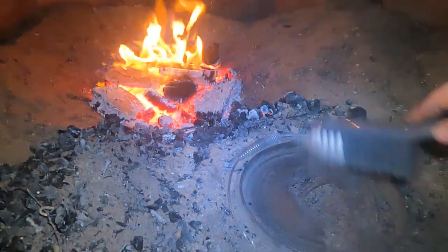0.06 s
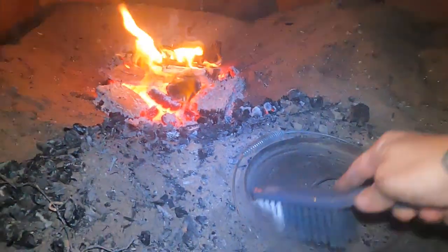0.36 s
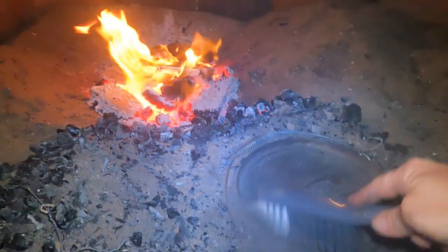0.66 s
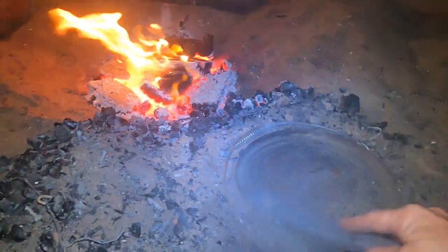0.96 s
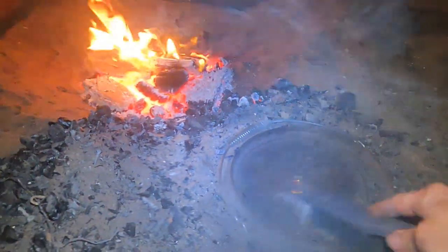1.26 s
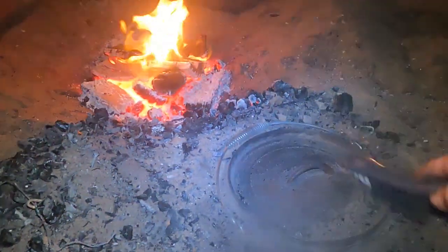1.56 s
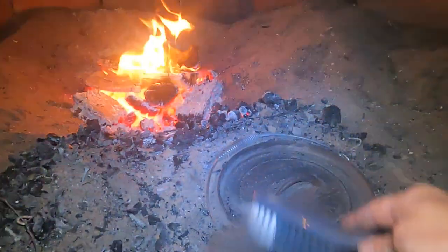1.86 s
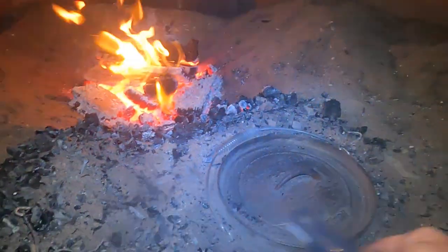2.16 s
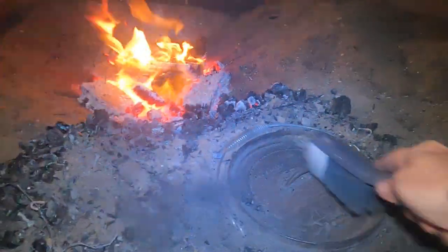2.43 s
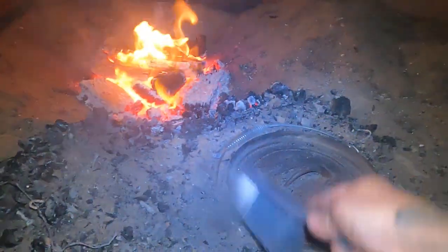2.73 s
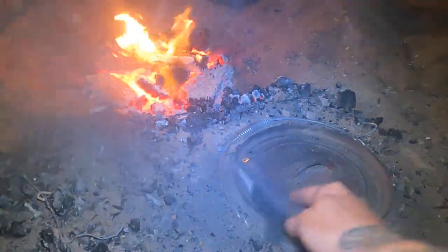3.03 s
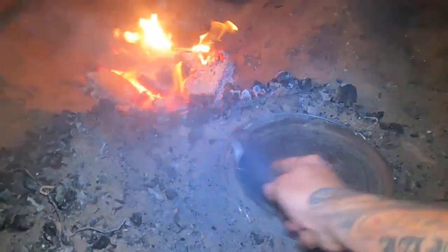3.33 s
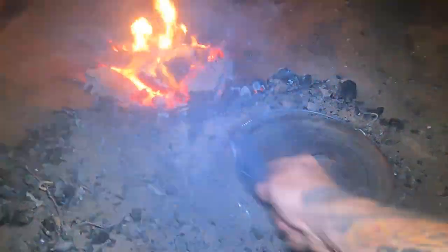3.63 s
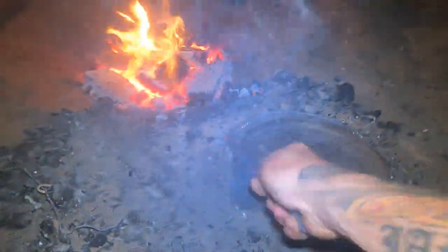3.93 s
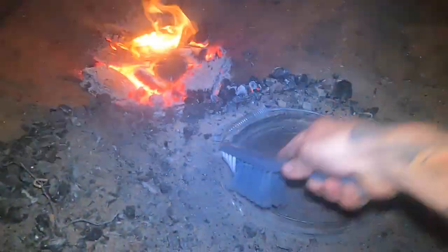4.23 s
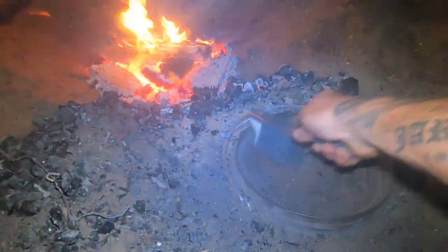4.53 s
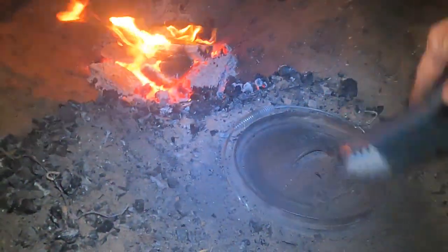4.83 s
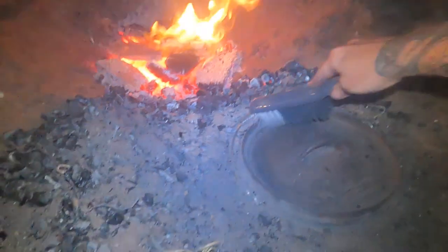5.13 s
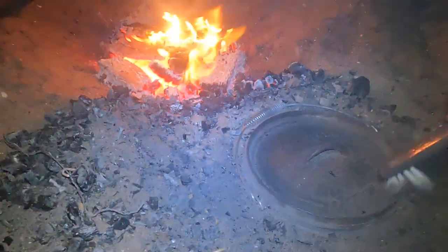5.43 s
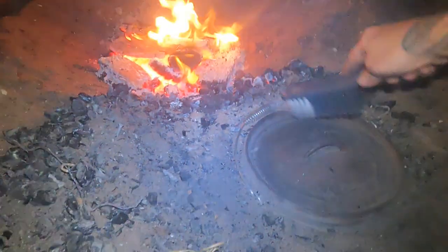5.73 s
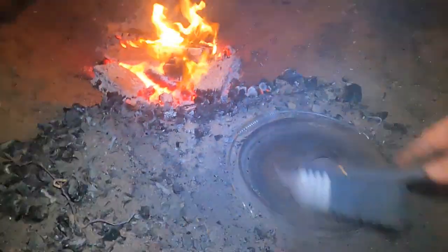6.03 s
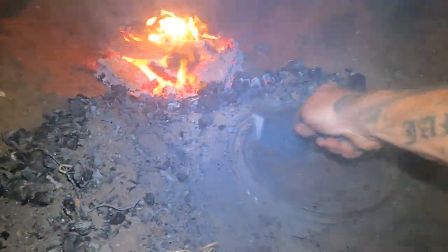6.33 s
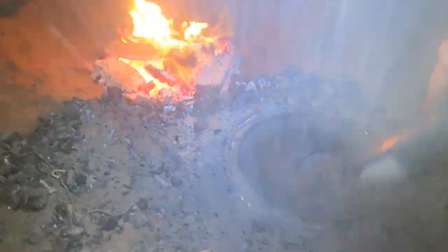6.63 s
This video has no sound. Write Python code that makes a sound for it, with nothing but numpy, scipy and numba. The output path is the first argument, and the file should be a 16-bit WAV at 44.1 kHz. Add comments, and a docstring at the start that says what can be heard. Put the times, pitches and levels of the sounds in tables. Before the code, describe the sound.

A stiff brush sweeps ash off an iron lid in quick rasping strokes, with occasional knocks, beside a softly fluttering fire.

```python
"""Brushing ash off an iron lid

A stiff hand brush sweeps an iron pot lid lying beside a small wood fire, outdoors.
Bristles catch and flick in a dense rasp that rings the lid, and friction makes a few modes sing.
Now and then the brush slaps down and the lid thuds. Loose grit ticks while flames flutter softly."""
import sys
import numpy as np
from scipy import signal
from scipy.fft import rfft, irfft
from scipy.io import wavfile
from numba import njit

SR = 44100
rng = np.random.default_rng(int(sys.argv[2]) if len(sys.argv) > 2 else 0)


def master(y):
    """Save y as 16-bit WAV."""
    cut = np.clip(np.atleast_2d(y).T, -1, 1)
    pcm = np.round(cut * 32767)  # scale
    wavfile.write(sys.argv[1], SR, pcm.astype(np.int16))


N = 303849
TIME = np.arange(N) / SR


def undb(db):
    """Decibels to gain."""
    return 10 ** (np.asarray(db) / 20)


def add(track, s, sound):
    """Mix a sound into a track at s seconds."""
    start = max(int(s * SR), 0)
    track[start:start + len(sound)] += sound[:max(N - start, 0)]


def bump(s, length_s):
    """A smooth rise and fall around a moment, peaking at 1."""
    return np.exp(-(2 * (TIME - s) / length_s) ** 2)


def walk(rate):
    """Random drift with a spread near 1, heading for a new value rate times a second."""
    knots = rng.standard_normal(int(rate * N / SR) + 2)
    return 1.2 * np.interp(TIME * rate, np.arange(len(knots)), knots)


def flicks(rate, spread_db):
    """Random tiny impacts of unequal size, rms 1; rate per second."""
    chance = np.clip(rate / SR, 1 / SR, 1)
    hits = (rng.random(N) < chance) * rng.choice([-1, 1], N)
    clicks = hits * undb(spread_db * rng.standard_normal(N)) / np.sqrt(chance)
    return clicks / np.std(clicks)


def colour(x, points, size=2048):
    """Minimum-phase EQ of unit power that follows a curve of (Hz, dB) points."""
    hz, db = np.transpose(points)
    bins = np.maximum(np.arange(size // 2 + 1) * SR / size, 1)
    gain = undb(np.interp(np.log(bins), np.log(hz), db))
    cepstrum = irfft(np.log(gain))
    response = irfft(np.exp(rfft(2 * cepstrum[:size // 2], size)))
    return signal.fftconvolve(x, response / np.linalg.norm(response))[:N]


def mode(x, hz, t60):
    """One decaying resonance of unit power."""
    r = 1000 ** (-1 / (t60 * SR))
    feedback = [1, -2 * r * np.cos(2 * np.pi * hz / SR), r * r]
    return np.sqrt((1 - r * r) / 2) * signal.lfilter([1, 0, -1], feedback, x)


@njit
def glide(x, hz, q):
    """Band-pass whose centre moves, of about unit power."""
    y, band, low = np.empty(len(x)), 0., 0.
    for i in range(len(x)):
        g = np.tan(np.pi * hz[i] / SR)
        v = (band + g * (x[i] + 1e-18 - low)) / (1 + g * (g + 1 / q))
        band, low = 2 * v - band, low + 2 * g * v
        y[i] = v / np.sqrt(g * q)
    return y


# The hand digs in for a moment. Each row: centre in seconds, length in seconds, extra pressure in dB.
HAND_DIGS = [(0.395, 0.032, 3), (1.056, 0.022, 2), (1.873, 0.026, 2.5), (2.697, 0.048, 3.5),
             (3.13, 0.038, 3), (4.823, 0.044, 2.5), (5.5, .03, 4), (5.55, .035, 2.5), (5.895, 0.032, 5.5),
             (5.965, 0.018, 2.5), (6.622, 0.067, 4.5), (6.688, 0.025, 1.5)]


def hand(touch_s, full_s, lift_s, gone_s, landing_db, sag_db, fade_db=23, edge_s=.0016):
    """The hand leans in, sags and lifts: contact (0 to 1), pressure in dB, progress (-.5 to .5)."""
    def share(start_s, end_s, limit=1):
        """How far the time has come between two moments."""
        return np.minimum(np.maximum(TIME - start_s, 0) / np.maximum(end_s - start_s, 1 / SR), limit)
    swell = landing_db * (1 - share(touch_s, full_s))
    sag = sag_db * np.sin(np.pi * share(full_s, lift_s)) ** 2
    gone_s = np.maximum(gone_s, lift_s + .055)  # the quickest the hand can lift
    fade = fade_db * share(lift_s, gone_s, limit=np.inf) ** 1.226
    digs = sum(db * bump(s, length_s) for s, length_s, db in HAND_DIGS)
    pressure_db = np.maximum(digs - swell - sag - fade, -100)
    return share(touch_s, touch_s + edge_s), pressure_db, share(touch_s, gone_s) - .5


# Sweeps of the brush. Each row: touch-down, full pressure, start of lift and end of fade in seconds;
# level, softening on landing, mid-hold sag, hiss send, scrape send and lid send in dB;
# pitch of the bristle tips in Hz; sends to the low, middle and high singing modes in dB.
SWEEPS = [ (0.0, 0.028, .038, 0.13, -26, -1, -3.5, -10.5, -19.5, -0.5, 3620, -25, -10, -18),
          (0.32, .405, 0.46, 0.53, -26.5, 7, 1.5, -14, -18.5, 2.5, 3240, -19, -28, -28),
          (0.675, 0.731, .76, 0.82, -26, 10.5, 0.5, -11, -19.5, -0.5, 2730, -25, -30, -20),
          (0.987, 1.06, 1.075, 1.197, -26, 9, 1.5, -10.5, -16, 1.5, 2810, -17.5, -23, -20),
          (1.323, 1.385, 1.414, 1.478, -28, 7.5, 0, -7, -12.5, 5, 2910, -20.5, -18, -14),
          (1.644, 1.87, 1.93, 2.025, -27, 7, -2, -9, -14, 0, 3150, -39, -16, -19),
          (2.181, 2.316, 2.348, 2.45, -28, 13.5, 1, -9.5, -13.5, 1, 3380, -30, -21, -24),
          (2.598, 2.8, 2.83, 2.903, -26.5, 17, 0, -11, -17, 0, 3050, -28, -13, -21),
          (3.062, 3.133, 3.233, 3.29, -28, 9.5, 7, -9.5, -10.5, 1, 3300, -25, -13, -22),
          (3.426, 3.459, 3.496, 3.593, -25, 10.5, 0, -11.5, -12, -5, 3560, -31, -9.5, -23),
          (3.702, 3.745, 3.74, 3.91, -27, 9, -1.5, -7.5, -7, -1, 2600, -25, -14.5, -30),
          (4.02, 4.046, 4.12, 4.175, -30.5, -1, 9, -10.5, -7, 0, 3350, -21, -12.5, -20),
          (4.256, 4.285, 4.301, 4.455, -24, 19, 4, -13.5, -8.5, 1.5, 3660, -29, -11, -17),
          (4.593, 4.763, 4.94, 5.03, -24.5, 8.5, 2, -11.5, -17, -1.5, 3105, -25, -10.5, -21.5),
          (4.998, 5.032, 5.075, 5.1, -40.5, -2, 0.5, -6.5, -16, -7.5, 3180, -28, -22.5, -19),
          (5.2, 5.372, 5.562, 5.628, -25, 28, 5.5, -7.5, -12, 2.5, 3300, -22, -17, -19),
          (5.861, 5.97, 6.095, 6.215, -25, 22.5, 2.5, -9.5, -17.5, 1, 3400, -32, -13, -18.5),
          (6.388, 6.623, 6.73, 6.82, -26.5, 9, -0.5, -11, -14.5, 0, 3150, -25, -12.5, -22.5), ]


def sweeps(hiss_trend_db=4, scrape_trend_db=-5, lid_trend_db=-6, singing_trend_db=(-12.5, -3.5, 3)):
    """Effort and tone of each sweep; as the bristles bend over, each send shifts by its trend."""
    rows = np.array(SWEEPS)
    current = np.maximum(np.searchsorted(rows[:, 0], TIME, side="right") - 1, 0)
    (touch_s, full_s, lift_s, gone_s, level_db, landing_db, sag_db,
     hiss_db, scrape_db, lid_db, tips_hz, *singing_db) = rows.T[:, current]
    contact, pressure_db, progress = hand(touch_s, full_s, lift_s, gone_s, landing_db, sag_db)
    effort = contact * undb(level_db + pressure_db)
    # a light touch keeps more of its hiss and scrape
    hiss = undb(hiss_db + hiss_trend_db * progress - .11 * pressure_db)
    scrape = undb(scrape_db + scrape_trend_db * progress - .26 * pressure_db)
    tips_hz = tips_hz * 2 ** (.3 * progress)  # rises .3 octave through the sweep
    coupling = undb(lid_db + lid_trend_db * progress)
    pumping = [effort * undb(db + trend * progress) for db, trend in zip(singing_db, singing_trend_db)]
    return effort, hiss, scrape, tips_hz, coupling, pumping


def bristles(effort):
    """Bristles stick and let go in uneven tufts, more of them in a hard sweep."""
    rate = 1800 + 9000 * np.sqrt(effort / effort.max())
    tufts = undb(1.03 * walk(110) + 1.24 * walk(45))
    return effort * tufts * flicks(rate, spread_db=2.5)


# The brush's biting rasp, fine hiss and coarse scrape. Each row: frequency in Hz, relative gain in dB.
RASP_EQ = [(100, -18), (800, -39.5), (1300, -3), (1750, 4.5), (2300, 5), (3100, 0.5), (4200, 1.5),
           (5500, -0.5), (7500, -14.5), (14000, -45)]
HISS_EQ = [(100, -67), (3000, -22.5), (5000, 5), (6200, 8.5), (7500, 1.5), (9000, 1), (10300, -2.5),
           (11700, -6), (14500, -4)]
SCRAPE_EQ = [(40, -34), (120, -2), (260, 0), (380, 2.5), (520, -2.5), (800, -3.5), (1020, -1), (1250, 1),
             (1600, -1.5), (3000, -23.5), (14000, -52)]


def brush(rub, burst, hiss, scrape, tips_hz):
    """Bristles on iron rasp, hiss and scrape; their tips squeak at a pitch that wanders tuft to tuft."""
    rasp = colour(rub + undb(-4) * burst, RASP_EQ)
    tips = glide(rasp, tips_hz * undb(1.32 * walk(40)), q=37.0)
    fine = colour(rub * hiss + undb(-20) * burst, HISS_EQ)
    coarse = colour(rub * scrape + undb(-18) * burst, SCRAPE_EQ)
    return undb(-10) * rasp + undb(-20) * tips + undb(2.5) * fine + undb(-2.5) * coarse


# The ring of the iron lid. Each row: pitch in Hz, level in dB, time to fall 60 dB in seconds.
LID_MODES = [(1005, -26, .07), (1487, -26, .14), (1725, -24, .035), (2030, -19, .055), (2536, -17, .05),
             (2741, -16, .09), (2945, -17, .13), (3030, -20, .1), (3068, -18, .1), (3306, -18, .09),
             (3750, -23, .22), (3772, -22, .15), (3984, -15, .15), (4570, -25, .06), (4991, -22, .14),
             (5160, -25, .16), (5394, -30, .07), (5744, -22, .14), (5928, -22, .1), (6342, -25, .14),
             (6525, -28, .11), (7047, -27, .13), (7429, -31, .07), (7650, -33, .1), (7827, -36, .1),
             (8048, -35, .08), (9954, -35, .07), (10551, -33, .07), (11321, -37, .06), (11623, -35, .06)]


def lid(force, wander_db=4):
    """The lid rings, each mode driven more or less as the brush travels over its nodes."""
    return sum(mode(force * undb(db + wander_db * walk(14)), hz, t60) for hz, db, t60 in LID_MODES)


# The bristles catch and the lid squeals.
# Each row: centre in seconds, length in seconds, level in dB, pitch of the singing mode in Hz.
LID_SQUEALS = [(0.023, 0.044, -32, 4991), (0.398, 0.034, -44, 1487), (0.43, .04, -32, 3752),
               (1.868, 0.038, -47.5, 4991), (2.3, .04, -30, 3752), (2.825, 0.045, -31, 3752),
               (3.22, .035, -39, 3752), (3.451, .02, -32, 4991), (4.03, 0.024, -28, 3752),
               (4.29, 0.038, -33, 4991), (5.418, 0.026, -40, 4991), (5.493, .025, -35, 1487),
               (5.524, 0.038, -26.5, 3752), (5.959, .05, -33.5, 4991), (6.012, .025, -37, 1487),
               (6.14, .04, -39, 3752), (6.69, 0.054, -35, 3752)]


def singing(pumping, pitches_hz=(1487, 3752, 4991), lags_s=(.0098, .026, .011), drift_hz=10, rough_db=3):
    """Friction pumps three modes that sing through a sweep, surge into squeals and then die away."""
    voices = 0
    for hz, lag_s, drive in zip(pitches_hz, lags_s, pumping):
        squeals = sum(undb(db) * bump(s, length_s)
                      for s, length_s, db, mode_hz in LID_SQUEALS if mode_hz == hz)
        decay = np.exp(-1 / (lag_s * SR))
        swing = signal.lfilter([1 - decay], [1, -decay], drive + squeals)
        phase = 2 * np.pi * np.cumsum(hz + drift_hz * walk(70)) / SR
        voices += swing * undb(rough_db * walk(60)) * np.sqrt(2) * np.sin(phase)
    return voices


# The warm body of the flames. Each row: frequency in Hz, relative gain in dB.
FIRE_EQ = [(20, -37), (45, -20), (90, -6.5), (140, 2.5), (190, 5), (270, -9), (400, -6.5), (700, -12),
           (1500, -18), (3500, -20.5), (7000, -23.5), (11500, -26), (14500, -28)]


def fire():
    """Flames flutter with a soft low roar."""
    flutter = undb(1.16 * walk(3.12) + 4.3 * walk(23.784))
    return undb(-52) * colour(flutter * rng.standard_normal(N), FIRE_EQ)


# The fader ride of the trickling grit. Each row: time in seconds, level in dB.
TRICKLE_RIDE = [(0, -51), (.6, -65), (.9, -84), (1.5, -55), (3, -55), (3.7, -66), (4.5, -57), (5.05, -59),
                (5.2, -53), (5.75, -54), (6.3, -51), (6.89, -50.5)]
# Crumbs of charcoal land. Each row: start in seconds, level in dB.
CRUMB_HITS = [(0.165, -22.5), (0.25, -31.5), (0.29, -32.5), (0.611, -33), (0.622, -34.5), (1.5053, -29.5),
              (2.054, -30), (2.121, -34), (2.598, -30), (2.993, -32), (3.03, -30.5), (3.366, -27.5),
              (3.9993, -31), (5.034, -24), (5.0992, -30), (5.696, -29), (5.7434, -31), (5.758, -24.5),
              (5.7787, -29), (5.8033, -32), (5.8641, -28), (6.2407, -27), (6.2894, -25), (6.322, -29.5)]
# The dry tick of the grit. Each row: frequency in Hz, relative gain in dB.
GRIT_EQ = [(100, 7.5), (800, -8), (2000, -1.5), (3500, 0), (6000, -2.5), (8000, -10.5), (11500, -9),
           (14500, -41)]


def grit(fade_s=.0017):
    """Crumbs crunch down while finer grains trickle: their force on the lid, and their own ticking."""
    crunch = np.zeros(N)
    for s, db in CRUMB_HITS:
        add(crunch, s, undb(db) * np.exp(-TIME[:SR // 50] / fade_s))
    trickle = undb(np.interp(TIME, *np.transpose(TRICKLE_RIDE)) + .76 * walk(17))
    grains = undb(-9) * crunch * rng.standard_normal(N) + trickle * flicks(700, spread_db=-.5)
    return grains, colour(grains, GRIT_EQ)


# The brush slaps or snags on the lid. Each row: start in seconds, slap level in dB, thud level in dB,
# pitch of the struck spot in Hz, then clack and ring in dB relative to the slap.
BRUSH_SLAPS = [(0.322, -17.5, -49, 3830, -9, 2), (0.385, -20, -54, 3400, 0, 8),
               (0.432, -13.5, -71, 3060, 1.5, 5.5), (0.465, -25, -59, 3800, -2, 3),
               (0.994, -23, -36.5, 4100, -12, 6), (1.041, -23, -38.5, 3070, -4, -2),
               (1.327, -7.5, -22, 2540, -8, -2.5), (1.648, -24, -34, 2800, -1, 5),
               (1.662, -15, -29, 1960, -0.5, 5), (2.186, -15.5, -43, 2764, -3.5, -0.5),
               (2.652, -20, -53, 2800, -20, 3.5), (3.065, -18, -36, 2460, -20, -0.5),
               (3.092, -17.5, -44, 2540, -7, -2), (3.453, -4.5, -17.5, 3985, -5.5, -2),
               (3.736, -12, -26.5, 2516, 2, 3), (3.762, -14, -30.5, 2596, -2, 0),
               (4.023, -7.5, -44, 2850, -4.5, -2), (4.054, -11, -27, 3730, -10, -1),
               (4.26, -17.5, -35, 1930, -7, -6), (4.278, -7, -25.5, 5060, -7.5, -0.5),
               (4.31, -14.5, -28.5, 3760, -6, 1), (4.599, -12, -28.5, 3760, -10, -6),
               (4.69, -18, -46, 2660, -4, 5), (6.017, -14, -37, 2946, -5, 2),
               (6.387, -27.5, -53, 3020, -13, -2)]


def slaps(fade_s=.0059, rise_s=.00054, push_s=.00047, spot_t60=.069):
    """Bristles land in a burst, the struck spot clacks, and the brush's weight pushes and hits the lid."""
    burst, clack, push, blow = np.zeros((4, N))
    t = TIME[:SR // 10]
    attack = 1 - np.exp(-t / rise_s)
    landing = attack * np.exp(-t / fade_s)
    knock = attack * undb(-60 * t / spot_t60)
    weight = t * np.exp(-t / push_s)
    for s, db, thud_db, spot_hz, clack_db, ring_db in BRUSH_SLAPS:
        add(burst, s - .001, undb(db) * landing)
        add(clack, s, undb(db + clack_db) * knock * np.sin(2 * np.pi * spot_hz * t))
        add(push, s + .0015, undb(thud_db) * weight / weight.max())
        add(blow, s + .002, undb([db + ring_db]))
    burst *= flicks(20000, spread_db=1)
    clack *= 1 + .42 * walk(900)  # bristles rattle on the spot and roughen its note
    return burst, clack, push, blow


# The lid's low modes, damped by the ground.
# Each row: pitch in Hz, level in dB, time to fall 60 dB in seconds.
THUD_MODES = [(304, -8.5, 0.18), (334, -3, 0.043), (394, -7.5, 0.075), (1050, 1, 0.15)]


def thud(push):
    """The whole lid bumps on its bed of ash."""
    return sum(undb(db) * mode(push, hz, t60) for hz, db, t60 in THUD_MODES)


# The tone of the stereo fizz. Each row: frequency in Hz, relative gain of the side signal in dB.
WIDTH_EQ = [(100, -34), (500, -29.5), (1000, -34), (2700, -58.5), (5000, -41.5), (7500, -22.5), (9500, -17),
            (10700, -15), (11700, 0), (14000, 2.5)]


def spread(sound):
    """A faint fizzy stereo width, mostly in the top treble, over a quiet, wide rustle of the fire."""
    side = undb(-7) * colour(sound * walk(1500), WIDTH_EQ) + undb(-30) * fire()
    return np.array([sound + side, sound - side])


def scene():
    """Brush, lid, grit and fire, close in front."""
    effort, hiss, scrape, tips_hz, coupling, pumping = sweeps()
    rub = bristles(effort)
    burst, clack, push, blow = slaps()
    grains, ticks = grit()
    brushing = brush(rub, burst, hiss, scrape, tips_hz)
    lid_force = rub * coupling + undb(-34) * burst + undb(16) * blow + undb(-9.5) * grains
    ring = undb(-1.5) * lid(lid_force) + singing(pumping)
    knocks = undb(-6.5) * clack + undb(-8) * thud(push)
    return spread(brushing + ring + knocks + ticks + fire())


def record(dry, notch_hz=9050, notch_q=2.4, bass_hz=50, air_hz=12200, top_hz=14250):
    """The microphone port notches the treble and loses the deepest bass; the top fades and is cut."""
    dipped = signal.lfilter(*signal.iirnotch(notch_hz, notch_q, fs=SR), dry)
    heard = dipped + undb(-17.5) * (dry - dipped)
    heard = signal.sosfilt(signal.butter(2, bass_hz, "high", fs=SR, output="sos"), heard)
    heard = signal.sosfilt(signal.butter(10, air_hz, fs=SR, output="sos"), heard)
    return signal.sosfilt(signal.ellip(10, .2, 80, top_hz, fs=SR, output="sos"), heard)


dry = scene()
out = record(dry)
master(out)
```